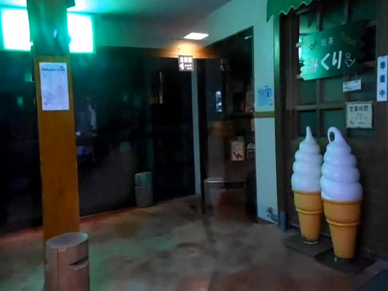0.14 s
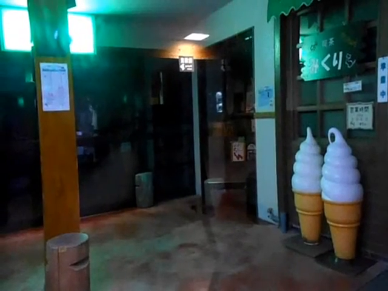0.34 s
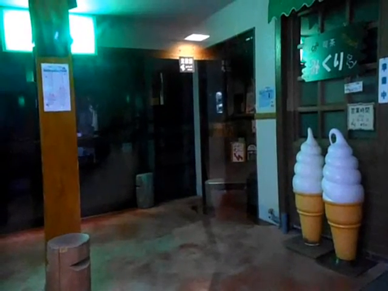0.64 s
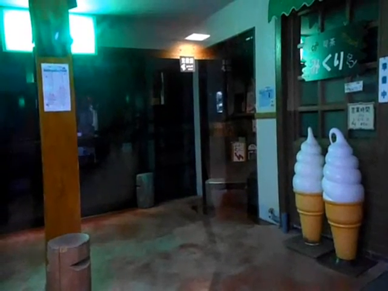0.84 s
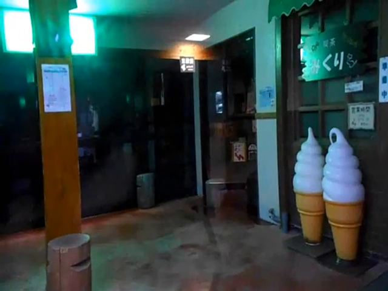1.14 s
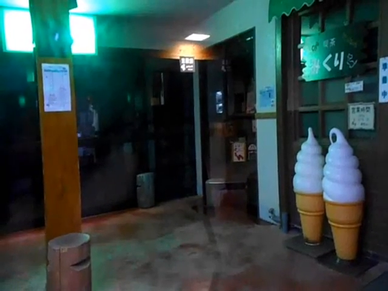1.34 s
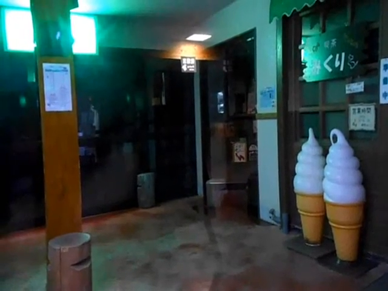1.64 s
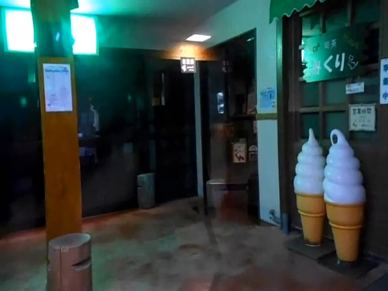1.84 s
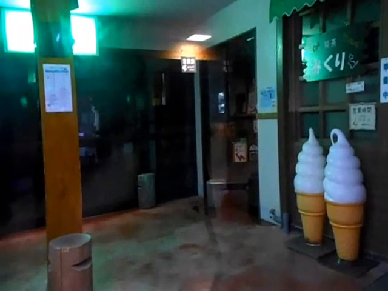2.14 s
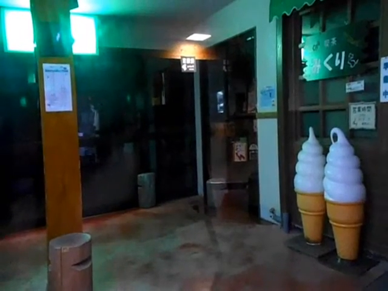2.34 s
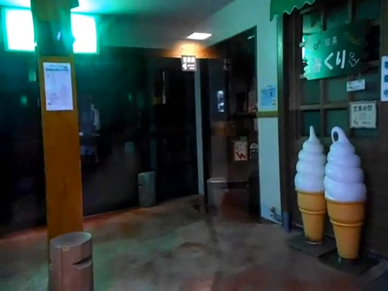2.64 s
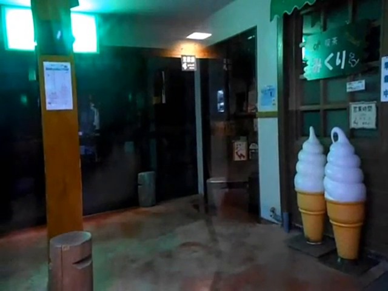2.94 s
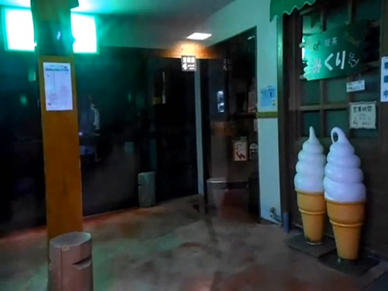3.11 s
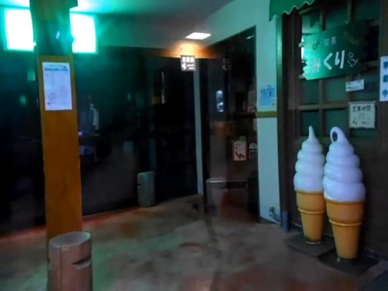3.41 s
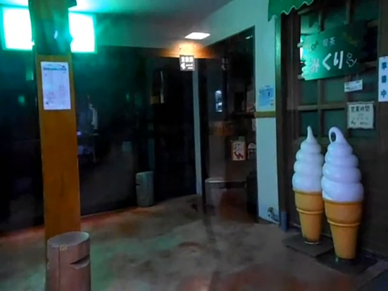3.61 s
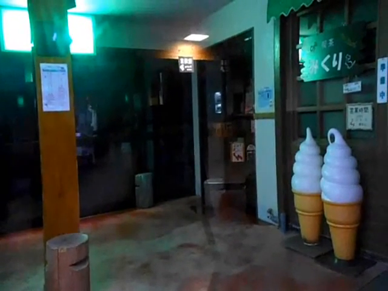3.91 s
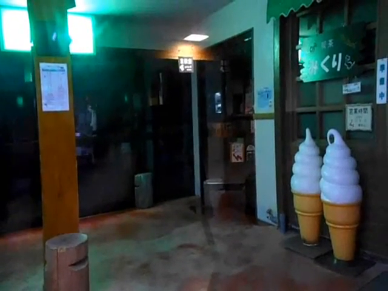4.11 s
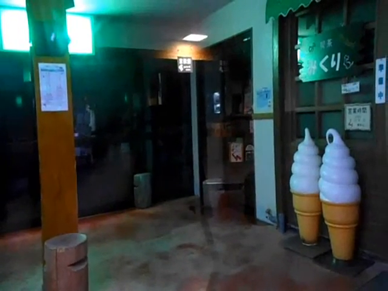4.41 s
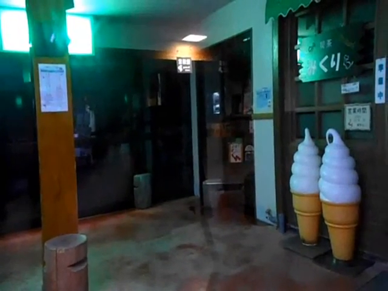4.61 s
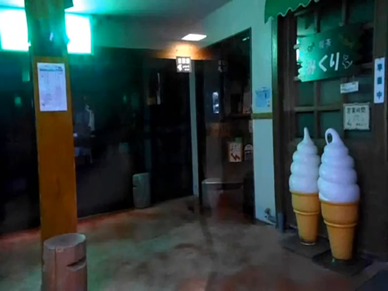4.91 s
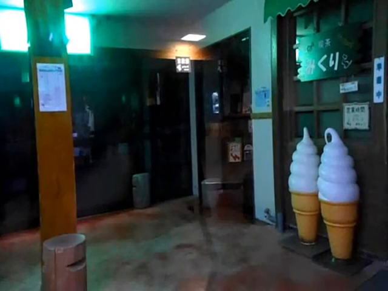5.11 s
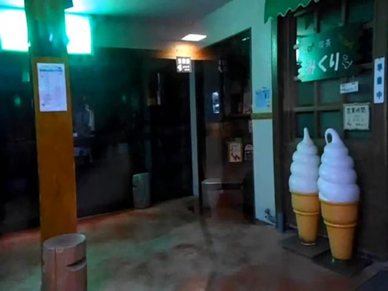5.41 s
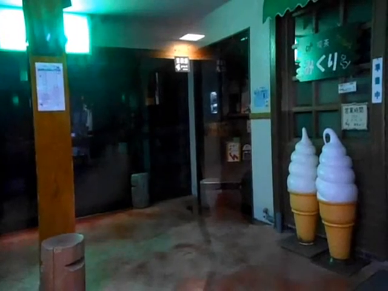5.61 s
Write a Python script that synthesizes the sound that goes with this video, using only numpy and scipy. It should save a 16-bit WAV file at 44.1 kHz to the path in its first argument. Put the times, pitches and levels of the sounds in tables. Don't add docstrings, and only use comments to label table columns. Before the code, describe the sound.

In a covered shop passage at night, deep wind rumble swells and eases around a fixed small camera. Light metal clatter and a door rattle come first, then a hard slam just after two seconds makes the wind duck briefly. The gusts return stronger, with repeated thuds, rattling panes, airy whistles and a heaviest slam just past five seconds.

```python
import sys
import numpy as np
from scipy import signal
from scipy.fft import rfft, irfft, next_fast_len
from scipy.io import wavfile
from scipy.ndimage import uniform_filter1d, map_coordinates

SR = 44100
rng = np.random.default_rng(int(sys.argv[2]) if len(sys.argv) > 2 else 0)


def makeup_ratio(level_db):
    decades = np.asarray(level_db, float) / 20
    return 10 ** decades


def materialize(psi):
    bounded = np.clip(np.atleast_2d(psi).T, -1, 1)
    quanta = np.round(bounded * 32767).astype(np.int16)
    wavfile.write(sys.argv[1], SR, quanta)


N = 253575
TIME = np.arange(N) / SR


def unit(x):
    return x / np.sqrt(np.mean(x ** 2) + 1e-20)


def wobble(rate_hz):
    return map_coordinates(rng.standard_normal(700), [TIME * np.clip(rate_hz, .1, 100)])


def bump(at_s, width_s):
    return np.exp(-.5 * ((TIME - at_s) / width_s) ** 2)


def filtered(x, response):
    m = next_fast_len(N + SR // 2)
    return irfft(rfft(x, m) * response(np.fft.rfftfreq(m, 1 / SR)), m)[:N]


def body(modes):
    def response(f):
        total = 0
        for k, (hz, width_hz, db) in enumerate(modes):
            damping = 1j * f * width_hz
            total = total + (-1) ** k * makeup_ratio(db) * damping / (hz * hz - f * f + damping)
        return total
    return response


def rush(spectrum, patchy_db):
    z = signal.stft(rng.standard_normal(N + 512), nperseg=512)[2]
    field = uniform_filter1d(rng.standard_normal(z.shape), size=6, axis=0)
    field = uniform_filter1d(field, size=12, axis=1)
    noise = signal.istft(z * makeup_ratio(patchy_db * unit(field)), nperseg=512)[1][:N]
    hz, db = np.transpose(spectrum)
    return unit(filtered(noise, lambda f: makeup_ratio(np.interp(np.log(f + 1), np.log(hz + 1), db))))


def burst(start_s, db, t60_s, rise_s):
    out = np.zeros(N)
    i = slice(int(start_s * SR) + 1, int((start_s + t60_s) * SR))
    t = TIME[i] - start_s
    out[i] = makeup_ratio(db - 60 * t / t60_s) * (1 - np.exp(-t / rise_s))
    return out


def narrow(hz, width_hz):
    pole = np.exp(-np.pi * width_hz / SR)
    fuzz = signal.lfilter([1], [1, -2 * pole, pole ** 2], rng.standard_normal((2, 44100)))
    phase = 2 * np.pi * np.cumsum(hz) / SR
    along, across = unit(fuzz[:, -len(hz):])
    return along * np.cos(phase) + across * np.sin(phase)


def warble():
    # centre_s, half_width_s, share
    spells = [(.95, .06, 3), (1.68, .04, 3), (2.16, .02, 4), (2.38, .05, 8), (3.3, .04, 18), (3.5, .08, 8),
              (3.93, .06, 30), (4.35, .08, 30), (4.55, .07, 12), (4.8, .08, 8), (5.03, .06, 26),
              (5.45, .07, 18), (5.68, .04, 22)]
    line_db, line_hz, spread_hz = -86, 12100, 170
    edge_db, edge_ends_s = -95, 3.65
    odds = np.cumsum(sum(share / width_s * bump(s, width_s) for s, width_s, share in spells))
    place, pitch = rng.uniform(size=200), rng.standard_normal(200)
    starts = np.searchsorted(odds, place * odds[-1]) // 1024 * 1024 + 231
    out, k = np.zeros(N + 4096), np.arange(2048)
    for start, hz in zip(starts, line_hz + spread_hz * pitch):
        out[start + k] += makeup_ratio(line_db) * np.sin(np.pi * k / 2048) * np.sin(2 * np.pi * hz * k / SR)
    shown = wobble(24) > np.where(TIME < edge_ends_s, -.5, 1.7)
    edge = uniform_filter1d(shown * 1., size=900) * np.sin(np.pi / 2 * np.arange(N) + 1)
    return out[:N] + makeup_ratio(edge_db) * edge


def wash():
    # freq_hz, density_db
    wash_spectrum = [(900, -40), (1700, -0.5), (3000, -2), (4500, -14), (6500, -17.5), (9000, -58)]
    return makeup_ratio(-65) * rush(wash_spectrum, patchy_db=-5.0)


def lull():
    sink_start_s, sink_s, wait_s, climb_s, sink_db = 2.357, 0.16, 0.031, 0.35, 16.5
    knots_s = sink_start_s + np.cumsum([0, sink_s, wait_s, climb_s])
    return makeup_ratio(-sink_db * np.interp(TIME, knots_s, [0, 1, 1, 0]))


def wind():
    # time_s, strength_db
    gusts = [(0, -43), (.1, -50), (.55, -49), (.85, -44), (1.35, -46.5), (1.6, -45), (1.8, -41.5),
             (2.25, -38), (2.9, -43.5), (3.2, -38), (3.6, -38), (3.9, -34.5), (4.3, -34.5), (4.6, -35),
             (5.12, -34.5), (5.36, -39.5), (5.6, -37.5), (5.75, -36.5)]
    # freq_hz, density_db
    buffet_spectrum = [(2.4, -39), (4.0, 3.5), (21, -12.5), (29, -6.5), (48, -15), (60, -10), (78, -32),
                       (130, -120)]
    rumble_spectrum = [(32, -32), (55, -1), (81, 0.5), (145, -2), (173, -4), (254, -3.5), (420, -19.5),
                       (550, -34), (920, -120)]
    roar_spectrum = [(180, -25), (300, -3), (365, -5.5), (454, -5.5), (771, -8.5), (965, -6.5), (1560, -19),
                     (1700, -19), (2210, -26.5), (3740, -120)]
    hiss_spectrum = [(820, -10), (1400, -6), (1550, -25), (2050, -10), (2840, -5.5), (3090, -7),
                     (4310, -13.5), (5270, -14.5), (6430, -19.5), (7790, -23.5), (10300, -36), (13300, -69),
                     (22000, -120)]
    spray_spectrum = [(6000, -59.5), (8000, -12), (9500, -8), (10600, 5.5), (12000, -63.5)]
    # pitch_hz, width_hz, level_db over the rumble
    passage_modes = [(69, 8.8, 0), (97, 7.3, 0.5), (149, 30, -4), (247, 42, -5), (368, 15.4, 5)]
    # centre_s, loss_db, half_width_s
    low_dips = [
        (.47, 3.5, 0.034),
        (1.5, 2.5, 0.055),
        (2.2, 1.5, 0.044),
        (3.19, 3, 0.033),
        (3.75, 1.5, 0.11),
        (2.7, 2.5, 0.099),
        (3.36, -3, 0.037),
        (4.28, 3.5, 0.12),
        (5.6, 1.5, 0.07),
    ]
    strength_db = np.interp(TIME, *np.transpose(gusts))
    gust_db = strength_db + 40
    flutter = wobble(8.3)
    buffet_db = -27.5 + 0.4 * gust_db + 2.2 * wobble(4.4)
    rumble_db = -32 + 0.85 * gust_db + 1.2 * flutter + 1.3 * wobble(13)
    roar_db = strength_db + 1.09 + 0.35 * flutter + 0.7 * wobble(15)
    hiss_db = -50 + 1.06 * gust_db + 0.78 * flutter + 0.33 * wobble(25)
    spray_db = -74.5 + 1.6 * gust_db + .8 * wobble(7.7)
    buffet = makeup_ratio(buffet_db) * rush(buffet_spectrum, patchy_db=1.0)
    resonant = filtered(rush(rumble_spectrum, patchy_db=1.0), lambda f: 1 + np.abs(body(passage_modes)(f)))
    rumble = makeup_ratio(rumble_db) * unit(resonant)
    roar = makeup_ratio(roar_db) * rush(roar_spectrum, patchy_db=1.06)
    hiss = makeup_ratio(hiss_db) * rush(hiss_spectrum, patchy_db=0.65)
    spray = makeup_ratio(spray_db) * rush(spray_spectrum, patchy_db=5.5)
    dip_gain = makeup_ratio(-sum(db * bump(s, width_s) for s, db, width_s in low_dips))
    return dip_gain * (buffet + rumble) + roar + hiss + spray


def booms():
    # peak_s, mode_hz, peak_db
    boom_rows = [(.55, 79.7, -33), (.7, 75, -30.5), (.8, 99.3, -39), (.82, 149, -33.5), (.93, 98, -31),
                 (1.08, 99.1, -37), (1.33, 99.3, -34), (1.36, 48, -25), (2.83, 73.9, -32),
                 (3.05, 95.2, -26.5), (3.5, 149.4, -34.5), (3.62, 148, -35), (4.6, 148, -36),
                 (4.72, 148, -33), (5.14, 139.7, -24), (3.82, 349.5, -32.5), (3.85, 250, -31.5),
                 (4.05, 264, -35), (4.15, 249.6, -29.5), (.86, 52, -28), (1.02, 50, -30),
                 (1.19, 70.3, -29.5), (1.43, 70.5, -27.5), (1.63, 149, -29), (1.72, 77.4, -25.5),
                 (1.8, 143, -31.5), (1.94, 144.9, -30), (2.05, 100.6, -37.5), (2.07, 76.9, -27),
                 (2.1, 49.5, -24.5), (2.29, 96.1, -28), (2.3, 71, -29), (2.31, 147, -24), (3.02, 51, -23),
                 (3.08, 121.3, -27.5), (3.27, 79.6, -25), (3.3, 108, -25.5), (3.9, 72.6, -25),
                 (3.98, 56.4, -28), (3.99, 149, -27), (4.03, 101.4, -32), (4.08, 147, -31), (4.33, 74, -38),
                 (4.34, 98, -23.5), (4.46, 145.7, -35.5), (4.58, 48.1, -29), (4.68, 76, -30),
                 (4.8, 46.4, -25), (4.84, 147.8, -23), (4.92, 70, -30), (5.0, 99, -30), (5.16, 95, -22),
                 (5.18, 59, -26), (5.26, 99, -24), (5.33, 77.6, -23.5), (5.4, 145.8, -28),
                 (.04, 27.3, -21), (.66, 25.2, -26), (.76, 26.02, -27), (.86, 24.15, -18),
                  (1.05, 25.05, -23), (1.15, 25.84, -21), (1.45, 24.85, -29), (1.55, 26.7, -21),
                  (2.05, 26, -22), (2.15, 27, -21.5), (2.9, 26.94, -18.5), (3.25, 27, -25),
                  (3.85, 24.84, -29), (4.65, 28, -19.5), (1.12, 75.1, -33), (2.96, 73.4, -28),
                  (3.13, 75.6, -27.5), (4.76, 72.3, -29), (1.56, 99.8, -32.5), (1.66, 103, -31.5),
                  (5.06, 100, -27.5), (1.35, 148, -35), (3.05, 150, -33), (5.65, 148.8, -29),
                  (.95, 200, -37), (1.1, 190, -38.5), (5.62, 190, -31.5), (.4, 105, -39.5),
                  (2.7, 130, -39.5), (3.05, 205, -32.5), (4.64, 280, -31)]
    rise_s, fall_s, trim_db = 0.042, 0.052, -2.5
    out = np.zeros(N)
    for (s, hz, db), phase in zip(boom_rows, rng.uniform(0, 2 * np.pi, 120)):
        swell = bump(s, np.where(TIME < s, rise_s, fall_s))
        out += makeup_ratio(db + trim_db) * swell * np.cos(2 * np.pi * hz * TIME + phase)
    return out


def heave():
    # centre_s, peak_db
    swells = [(.3, -15), (.7, -28), (.95, -20), (1.25, -20.5), (1.549, -19.5), (1.89, -25.5), (2.2, -20.5),
              (3.06, -38), (3.36, -19), (3.8, -29), (4.06, -23.5), (4.32, -24.5), (4.75, -22),
              (5.12, -26.5), (5.641, -28)]
    # deepest_pull_s, peak_db, pitch_hz, fade_s
    surges = [
        (.072, -9, 10.5, .5),
        (2.332, -6.1, 11.6, .57),
    ]
    swell_s, calm_db = 0.085, -27.5
    swing = np.cos(2 * np.pi * np.cumsum(13.0 + 2.95 * wobble(6.3)) / SR)
    size = makeup_ratio(calm_db) + sum(makeup_ratio(db) * bump(s, swell_s) for s, db in swells)
    out = np.sqrt(2) * size * swing
    for s, db, hz, fade_s in surges:
        u = (TIME - s) / np.where(TIME < s, .36 * fade_s, fade_s)
        ring = makeup_ratio(db - 60 * np.abs(u) ** 1.7) * np.cos(2 * np.pi * hz * (TIME - s))
        out = out * (1 - np.exp(-(2.1 * u) ** 4)) - ring
    return out


def whistles():
    # start_s, end_s, from_hz, to_hz, level_db
    gap_tones = [(1.277, 1.411, 5400, 6000, -62), (1.37, 1.48, 6150, 6060, -63.5),
                 (1.41, 1.46, 5830, 5400, -62), (1.465, 1.533, 5380, 5400, -57),
                 (1.531, 1.632, 5350, 5300, -63), (1.532, 1.618, 5750, 5650, -58),
                 (2.054, 2.122, 5020, 5100, -67), (2.11, 2.2, 5200, 5120, -58),
                 (2.2, 2.272, 5250, 5400, -61), (3.086, 3.242, 5380, 5220, -55.5),
                 (3.2, 3.295, 5500, 5600, -52), (3.281, 3.379, 5520, 5550, -49.5),
                 (3.34, 3.45, 5820, 5780, -56), (3.381, 3.468, 5420, 5220, -52.5),
                 (3.46, 3.602, 5000, 5000, -58), (3.61, 3.784, 5170, 5130, -54.5),
                 (3.8, 3.849, 5250, 5400, -47), (3.84, 3.933, 5480, 5500, -45),
                 (3.93, 3.992, 5740, 6130, -50), (3.989, 4.124, 5360, 5400, -51),
                 (4.057, 4.13, 6380, 6600, -50), (4.11, 4.247, 6520, 6530, -53.5),
                 (4.19, 4.334, 5500, 5400, -52), (4.3, 4.56, 5450, 5270, -52.5),
                 (4.573, 4.673, 5270, 6570, -57), (5.178, 5.264, 6700, 6070, -56),
                 (4.67, 4.868, 6720, 6460, -51.5), (4.74, 4.90, 6080, 6150, -58),
                 (4.87, 4.942, 6500, 6960, -49), (4.935, 5.119, 7150, 7040, -50),
                 (5.11, 5.2, 7180, 7100, -58), (5.2, 5.3, 5750, 5700, -59),
                 (5.29, 5.528, 6020, 5950, -59.5), (5.47, 5.642, 5430, 5390, -54),
                 (5.58, 5.724, 5830, 6220, -53.5)]
    # start_s, end_s, from_hz, to_hz, level_db
    howl_tones = [
        (1.70, 1.83, 160, 350, -32.5),
        (2.06, 2.2, 260, 540, -36),
        (4.21, 4.48, 360, 390, -29.5),
        (4.9, 5.04, 620, 630, -33.5),
        (3.68, 4.46, 6900, 8800, -64),
    ]
    steady_hz, widest_hz, glide_blur = 120, 330, 2.4
    out = np.zeros(N)
    drift = 1 + 0.00636 * wobble(12)
    broken = makeup_ratio(2.0 * wobble(30) - 1.2)
    tones = [(row, min(steady_hz + glide_blur * abs(row[3] - row[2]), widest_hz)) for row in gap_tones]
    tones += [(row, .15 * row[2]) for row in howl_tones]
    for (start, end, from_hz, to_hz, db), width_hz in tones:
        i = slice(round((start - .03) * SR), min(round((end + .04) * SR), N))
        t = TIME[i]
        u = (t - start) / (end - start)
        fade = np.clip(np.minimum(t - start + .03, end + .04 - t) / .07, 0, 1)
        tone = narrow((from_hz + (to_hz - from_hz) * u) * drift[i], width_hz)
        out[i] += makeup_ratio(db - 0.5 - 3.2 * u) * fade * broken[i] * tone
    return out


def sheet():
    # start_s, peak_db, low_mode_hz, brightness_db, t60_s
    clatter = [(0.771, -47, 2940, -27, 0.25), (0.877, -53, 2910, -8, 0.25), (0.9197, -49, 2820, -27, 0.2),
               (1.1714, -60, 2920, -18, 0.25), (1.612, -51.5, 3500, 0, 0.46), (1.718, -54, 3300, -3, .2),
               (2.514, -46.5, 2910, -21, 0.22), (2.66, -52, 2960, -20, 0.96), (2.7, -63, 3020, -3, .5),
               (2.78, -58, 3100, -6, .5), (2.83, -46, 4580, -28, 0.55), (2.835, -37, 2900, -17, 0.32),
               (2.89, -39, 3020, -23, 0.32), (3.016, -32.5, 3290, -15, 0.25), (3.2706, -43, 2740, -6, 0.25),
               (3.5108, -34.5, 3520, -15, 0.17), (3.895, -35, 3160, -15.5, 0.2),
               (3.914, -41, 2870, 3.5, 0.13), (4.5777, -37, 2810, -15, 0.4), (4.99, -45, 2700, -2, 0.28),
               (5.515, -40, 3030, -9, 0.38), (5.666, -44, 3190, -6, .3), (5.685, -43, 3310, -2, 0.3)]
    # pitch_hz, width_hz, level_db
    sheet_modes = [(7480, 1300, 4), (10100, 2000, -22.5)]
    low, high = np.zeros(N), np.zeros(N)
    for s, db, hz, bright_db, t60_s in clatter:
        i = slice(round(s * SR), min(round((s + .4) * SR), N))
        tone = narrow(np.full(i.stop - i.start, hz), width_hz=750)
        low[i] += burst(s, db - 9, 1.2 * t60_s, .006)[i] * tone
        high += burst(s, db - 0.5 + bright_db, 0.025, 0.0015)
        high += burst(s, db - 11.5 + bright_db, 1.45 * t60_s, .004)
    ring = filtered(rng.standard_normal(N), lambda f: body(sheet_modes)(f) * f / (f + 5000))
    return low + high * unit(ring)


def pane():
    # start_s, peak_db, t60_s, frame_over_pane_db
    rattles = [(1.05, -45.5, 0.3, 0.5), (1.1, -50, 0.16, 3), (1.6022, -31.5, 0.16, -6),
               (1.618, -41, 0.65, -17), (1.711, -34, 0.53, -5), (1.722, -41, 0.6, 3), (2.271, -30, 0.3, -7),
               (2.2806, -38, 0.28, -8), (2.935, -43, 0.25, 1), (3.012, -37, .3, -11),
               (3.024, -44, 0.38, -1.5), (3.899, -27.5, 0.21, -14), (3.929, -36, 0.22, -21),
               (4.556, -33.5, 0.2, 0.5), (4.759, -40.5, 0.55, 2), (4.931, -25, 0.41, -11),
               (5.089, -30.5, 0.25, -4.5), (5.107, -42, 0.21, 1), (5.1404, -24.5, 0.2, -8.5),
               (5.2908, -33, 0.46, -3), (5.64, -38.5, 0.94, -0.5)]
    # start_s, peak_db, frame_over_pane_db
    ticks = [(1.628, -43, -8), (1.7253, -41, 10), (1.728, -37.5, 10.5), (1.7365, -42, 6), (1.609, -38, -14),
             (4.771, -42, 2), (2.2783, -25, -7), (2.304, -36, -9), (4.5645, -37, 4), (4.578, -32, -8),
             (4.949, -28, -12), (5.085, -34, -5), (5.0998, -30, 0.5), (5.2905, -35, -13), (4.9325, -24, -9),
             (5.1407, -24, -10), (2.2712, -21, -11), (2.2734, -21, -7), (2.2845, -25, -13),
             (2.312, -37, -10), (2.3171, -38, -10), (5.1203, -37, 2), (5.147, -27, -8)]
    # pitch_hz, width_hz, level_db
    pane_modes = [(2560, 460, 5.5), (3700, 650, 5.5), (4240, 960, 2), (5400, 1600, -4.5), (7550, 600, -6)]
    frame_modes = [(1828, 200, 4.5), (1640, 180, -9)]
    pane_top_hz, frame_top_hz, tap_top_hz = 7800, 3500, 5500
    rise_s, ragged_db, tap_db, tap_late_s = .003, 3, 19.5, 0.001016

    def blow(s, db, t60_s):
        return burst(s, db - 8.5, 0.029, rise_s) + burst(s, db - 13, t60_s, 2 * rise_s)

    def dull(f):
        return body(pane_modes)(f) / (1 + (f / pane_top_hz) ** 8)

    def frame(f):
        return body(frame_modes)(f) / (1 + 1j * f / frame_top_hz) ** 2

    def tapped_pane(f):
        return makeup_ratio(-7) * dull(f) * body(pane_modes)(f) / (1 + 1j * f / tap_top_hz)

    glass = sum(blow(s, db, t60_s) for s, db, t60_s, _ in rattles)
    wood = sum(blow(s, db + frame_db + 5.5, 1.26 * t60_s) for s, db, t60_s, frame_db in rattles)
    chatter = makeup_ratio(ragged_db * wobble(90)) * rng.standard_normal((2, N))
    taps = np.zeros((2, N))
    for s, db, *_, frame_db in rattles + ticks:
        taps[:, round((s + tap_late_s) * SR)] = makeup_ratio([db + tap_db, db + tap_db + frame_db + 15.5])
    clean = filtered(taps[0], tapped_pane) + filtered(taps[1], frame)
    return clean + glass * unit(filtered(chatter[0], dull)) + wood * unit(filtered(chatter[1], frame))


def door():
    # time_s, peak_db
    thuds = [(1.6151, -21), (1.79, -20), (1.901, -21.5), (2.0424, -15.5), (2.2878, -6), (2.948, -10.5),
             (3.27, -15.5), (3.591, -19.5), (3.7014, -19), (3.797, -10), (3.9578, -11.5), (4.087, -10.5),
             (4.5627, -22), (4.7, -17), (4.8291, -15.5), (4.9785, -8), (5.1517, -0.5), (5.211, -12.5),
             (5.329, -13), (5.4587, -11), (5.6587, -22.5), (5.746, -14)]
    blows = np.zeros(N)
    for s, db in thuds:
        blows[round(s * SR)] = makeup_ratio(db)
    t = np.arange(-SR // 100, SR // 20) / SR

    def pull(at_s, width_s):
        return np.exp(-.5 * ((t - at_s) / width_s) ** 2)

    shape = -1.1 * pull(0, 0.00075) + 0.14 * pull(-0.0025, 0.00044) + 0.2 * pull(0.0022, 0.00081)
    shape = shape - 0.2 * pull(0.008, 0.0014) - 0.22 * pull(0.014, 0.0015) + 0.18 * pull(0.013, 0.0024)
    return signal.fftconvolve(blows, shape)[SR // 100:][:N]


def scene():
    air = wash() + lull() * wind() + booms() + heave()
    return (air + whistles() + sheet() + pane() + door())[None]


def low_pass(x):
    return signal.sosfilt(signal.butter(12, 12700, fs=SR, output="sos"), x)


def record(dry):
    # time_s, loss_db
    ducks = [(.072, .4), (.0779, 1.1), (.0895, 1.5), (2.3303, .8), (2.3419, 1.1), (2.3534, 1.3),
             (2.365, 1.3), (2.3708, .45), (2.3883, 1.0), (2.4115, .55), (2.4232, .9), (2.4347, 1.1),
             (2.458, .5), (2.4703, 1.45), (2.5537, .7)]
    block, top_hz = 512, 10330
    x = dry[0] / (1 + np.abs(dry[0] / .41) ** 24) ** (1 / 24)
    lost_db = sum(db * (TIME >= s) * np.clip(1 - (TIME - s) * SR / block, 0, 1) for s, db in ducks)
    x = filtered(x * makeup_ratio(-lost_db), lambda f: .04 * (f < 12600) + .96 / (1 + (f / top_hz) ** 110))
    mix = x + warble()
    return low_pass(mix[None])


dry = scene()
out = record(dry)
materialize(out)
```